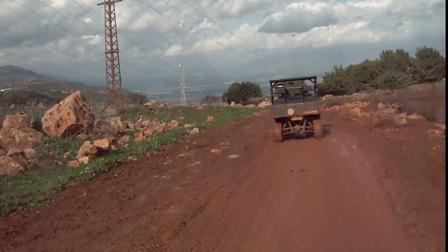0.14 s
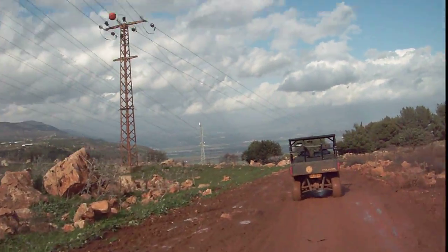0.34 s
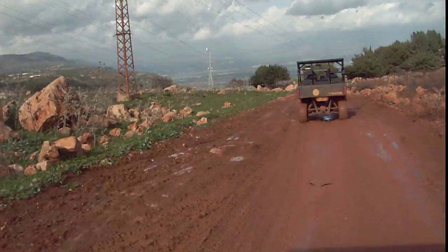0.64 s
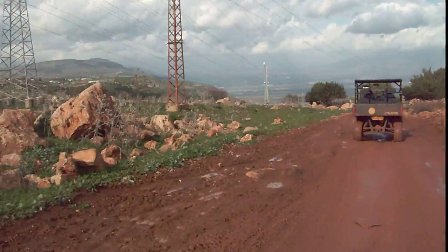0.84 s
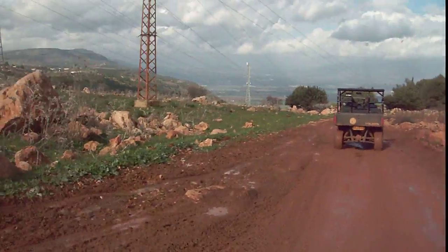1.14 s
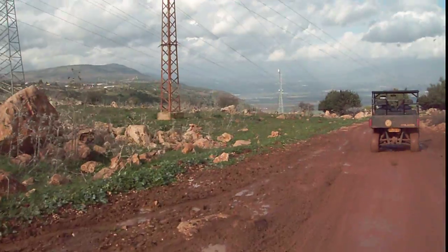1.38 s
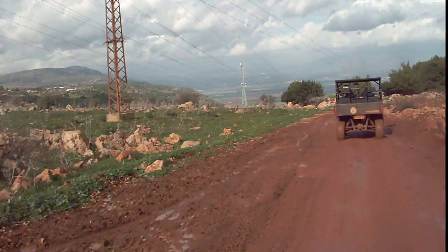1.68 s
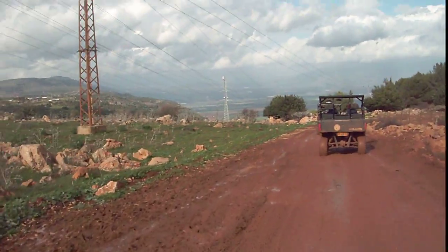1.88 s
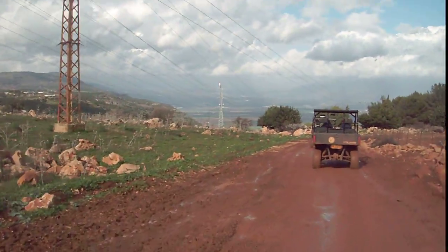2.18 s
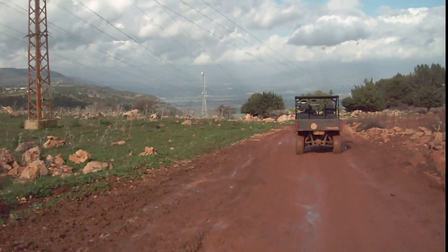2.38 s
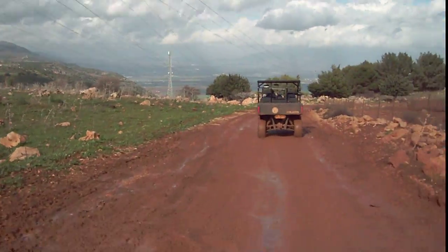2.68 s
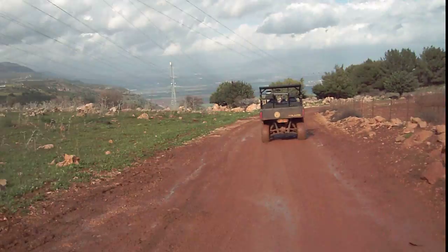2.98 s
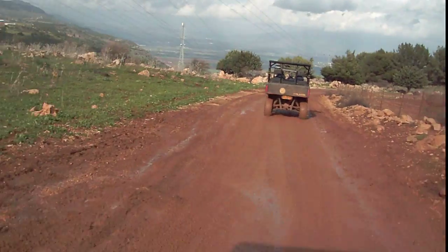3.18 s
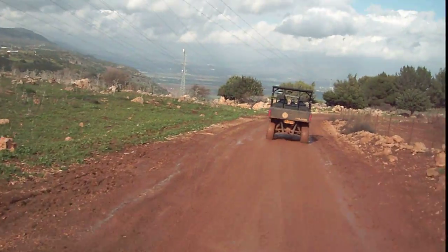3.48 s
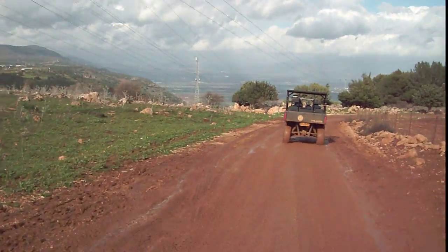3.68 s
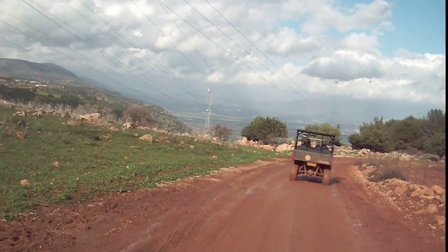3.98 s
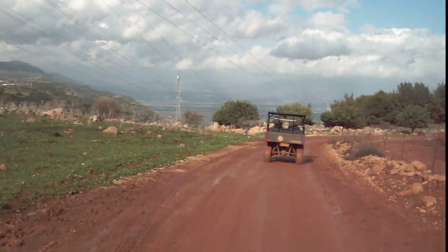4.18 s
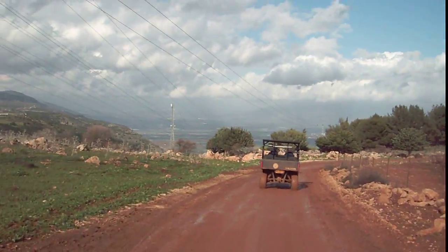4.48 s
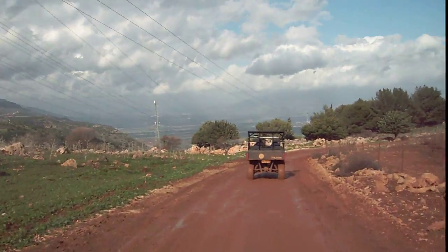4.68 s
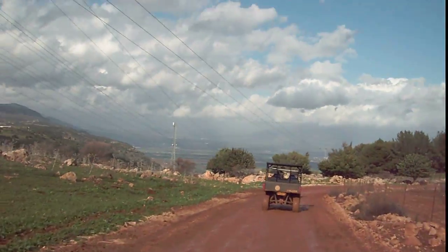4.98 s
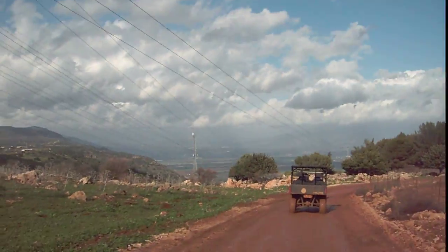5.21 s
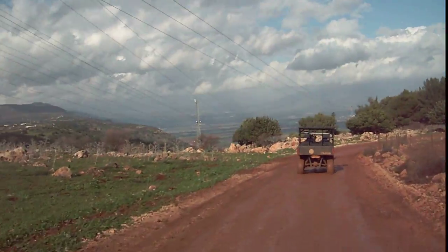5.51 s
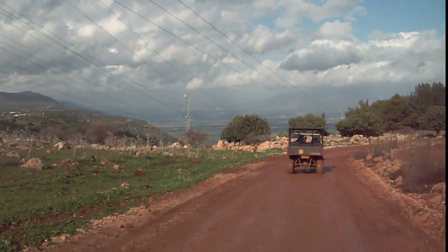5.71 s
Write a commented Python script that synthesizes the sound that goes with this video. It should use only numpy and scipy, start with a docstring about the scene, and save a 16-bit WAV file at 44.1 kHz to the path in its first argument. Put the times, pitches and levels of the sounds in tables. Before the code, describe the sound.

A side-by-side utility vehicle is heard on board as it drives along a dirt road in open country. Its low engine drone runs throughout, with valve and gear clatter, a faint belt whine, a thin high hiss and grit crunching lightly under the tyres. In the first second the engine pulls steadily while the body gives a few sharp rattles and a soft thud, and a couple of stones ping faintly. From about 1.3 seconds the engine eases off, dropping in pitch and level, and stays low until 3.7. Between 3 and 3.8 seconds, bumps bring a cluster of rattles and low thuds. Around 4 seconds the engine picks up with a brief belt squeal, followed by a longer boom from a rut at 4.4. It pulls on, easing slightly near 5.8 seconds. Low wind gusts buffet the microphone, most strongly in the first second or so.

```python
"""Engine of a side-by-side utility vehicle, heard on board on a dirt road, a second one ahead.
It pulls, eases off for two seconds and pulls again: a low exhaust drone of crank orders and gas puffs.
Valves and gears ring the casing; the drive belt sings, and squeals briefly as it takes up load.
Tyres crunch grit and fling stones, the body rattles on bumps and booms in ruts.
Slow gusts buffet the microphone."""
import sys
import numpy as np
from scipy import signal
from scipy.fft import rfft, irfft
from scipy.io import wavfile
from scipy.ndimage import uniform_filter1d

SR = 44100
rng = np.random.default_rng(int(sys.argv[2]) if len(sys.argv) > 2 else 0)


def log_audio(samples):
    """Write samples as a 16-bit WAV file to the path given in sys.argv[1]."""
    # one column per channel
    frames = np.atleast_2d(samples).T
    # limit to full scale, then quantise
    limited = np.clip(frames, -1, 1)
    pcm = np.round(limited * 32767).astype(np.int16)
    wavfile.write(sys.argv[1], SR, pcm)


N = 257984
TIME = np.arange(N) / SR

# engine casing modes: f/Hz, width/Hz, level/dB
CASING_MODES = [(1797, 103, -10.5), (1960, 140, -14), (2105, 15, -18), (2226, 78, -7), (2478, 140, -3.5),
                (2537, 74, 0.5), (2715, 112, -2), (2850, 380, -9.5), (3190, 430, -11), (4080, 2200, -27.5)]
# body panel modes: f/Hz, width/Hz, level/dB
PANEL_MODES = [(722, 55, -7), (834, 23, -1.5), (936.5, 65, 0.5), (1002, 37, -4.5), (1075, 87, -3.5),
               (1286, 75, 0.5), (1396, 92, -1)]
# noise spectrum of belt and tyres: f/Hz, level/dB
WASH_SPECTRUM = [(250, -1), (600, -5.5), (1000, -4.5), (1400, -3), (1600, -14), (2000, 1.5), (2600, 2),
                 (3300, -2.5), (4200, -9), (5200, -17.5), (6500, -19), (7800, -23), (10000, -16),
                 (15000, -51)]


def from_db(db):
    """Decibels to gain."""
    return 10 ** (np.asarray(db) / 20)


def unit_rms(x):
    """Scale to rms 1."""
    return x / np.sqrt(np.mean(x ** 2) + 1e-20)


def curve(rows):
    """Straight lines through (t/s, value) points."""
    return np.interp(TIME, *np.transpose(rows))


def swells(rows):
    """Sum of Gaussian bumps from (peak t/s, length/s, height) rows."""
    return sum(height * np.exp(-(2 * (TIME - t_s) / length_s) ** 2) for t_s, length_s, height in rows)


def drift(rate_hz):
    """Random wander below about rate_hz; rms 1."""
    f_hz = np.arange(N // 2 + 1) * SR / N
    return unit_rms(irfft(rfft(rng.standard_normal(N)) / (1 + (f_hz / rate_hz) ** 2) ** 2, N))


def coloured(x, spectrum):
    """Filter by (f/Hz, level/dB) points, falling 24 dB/octave outside them; rms 1."""
    f_hz = np.arange(N // 2 + 1) * SR / N + 1e-6
    hz, db = np.transpose(spectrum)
    outside_oct = np.maximum(np.log2(hz[0] / f_hz), 0) + np.maximum(np.log2(f_hz / hz[-1]), 0)
    gain = from_db(np.interp(np.log(f_hz), np.log(hz), db) - 24 * outside_oct)
    return unit_rms(irfft(rfft(x) * gain, N))


def bandpass(x, edges_hz, order):
    """Butterworth band-pass."""
    return signal.sosfilt(signal.butter(order, edges_hz, "band", fs=SR, output="sos"), x)


def resonance(x, hz, width_hz):
    """Two-pole resonator, peak gain 1."""
    r = np.exp(-np.pi * width_hz / SR)
    feedback = [1, -2 * r * np.cos(2 * np.pi * hz / SR), r * r]
    return signal.lfilter(np.array([1, 0, -1]) * (1 - r * r) / 2, feedback, x + 1e-18)


def ring(force, modes):
    """A rough contact force rings each mode separately; rms about that of the force."""
    ringing = sum(from_db(db) * resonance(force * rng.standard_normal(N), hz, width_hz)
                  for hz, width_hz, db in modes)
    power = sum(from_db(db) ** 2 * np.pi * width_hz / SR for _, width_hz, db in modes)
    return bandpass(ringing, [0.75 * modes[0][0], 1.12 * modes[-1][0]], order=4) / np.sqrt(power)


def knocks(rows, decay_s):
    """Contact force that jumps at each (t/s, level/dB) and decays."""
    impulses = np.zeros(N)
    for t_s, db in rows:
        impulses[round(t_s * SR)] = from_db(db)
    return signal.lfilter([1], [1, -np.exp(-1 / (decay_s * SR))], impulses + 1e-18)


def strokes(cycles, sharpness, uneven_db):
    """One decaying pulse of random strength per cycle; rms 1."""
    index = cycles.astype(int)
    strength = from_db(uneven_db * rng.standard_normal(index[-1] + 1))
    return unit_rms(strength[index] * np.exp(-sharpness * (cycles % 1)))


def engine_gain(law, speed_oct):
    """Gain that grows with engine speed and fades as the vehicle ahead draws away."""
    cruise_db, db_per_oct, loss_db_per_s = law
    return from_db(cruise_db + db_per_oct * speed_oct - loss_db_per_s * TIME)


def wind(speed_oct, cruise_db=-29, db_per_oct=6, restless_db=3.0, gain_db=-2.0):
    """Mostly infrasonic air pressure on the microphone: a stream plus single gusts."""
    # peak t/s, length/s, level/dB
    gust_hits = [(0.134, 0.14, -19), (0.486, 0.22, -21), (.78, .11, -15.5), (1.098, .26, -20),
                 (2.559, 0.065, -17.5), (3.45, 0.21, -22), (4.5, 0.092, -22.5), (4.956, 0.25, -23)]
    # f/Hz, level/dB
    spectrum = [(5, 0), (10, 0), (17, -4.5), (27, -13.0), (48, -19.0), (90, -28), (200, -29)]
    stream = from_db(cruise_db + db_per_oct * speed_oct + restless_db * drift(4.6))
    gusts = swells((t_s, length_s, from_db(db)) for t_s, length_s, db in gust_hits)
    pressure = coloured(rng.standard_normal(N), spectrum)
    levelled = pressure / np.sqrt(uniform_filter1d(pressure ** 2, size=SR // 5))
    return from_db(gain_db) * np.hypot(stream, gusts) * levelled


def tyre_roar(gain_db=-0.64, bumpy_db=0.8):
    """The uneven track shakes the panels through the tyres."""
    # track roughness: t/s, level/dB
    roughness = [(0, -43), (.8, -43), (1.6, -45), (2.85, -46.3), (3.4, -44), (4.6, -44.5), (5.0, -42),
                 (5.3, -45), (5.85, -44)]
    force = from_db(bumpy_db * drift(9.8))
    return from_db(gain_db + curve(roughness)) * ring(force, PANEL_MODES)


def thuds(gain_db=-3.5):
    """Wheels drop into ruts and the chassis booms."""
    # peak t/s, length/s, level/dB
    ruts = [(0.445, .09, -30), (3.266, 0.086, -25.5), (3.534, 0.13, -25.5), (3.772, 0.071, -25.5),
            (4.372, 0.32, -25.5)]
    # chassis boom: f/Hz, level/dB
    boom_spectrum = [(60, 3), (110, 8.5), (170, 2), (260, -10), (400, -19.5)]
    force = swells((t_s, length_s, from_db(db)) for t_s, length_s, db in ruts)
    return from_db(gain_db) * force * coloured(rng.standard_normal(N), boom_spectrum)


def stones(width_hz=400, gain_db=-17.0):
    """Stones flung by the tyres give short bright pings."""
    # t/s, level/dB, f/Hz
    hits = [(.54, -29, 6100), (0.641, -25, 4580), (2.74, -30, 5240), (3.46, -30, 5870)]
    pings = sum(ring(knocks([(t_s, db)], decay_s=0.0096), [(hz, width_hz, 0)]) for t_s, db, hz in hits)
    return from_db(gain_db) * pings


def rattles(casing_db=-2.5, panel_db=-12.5, scrape_db=-6.0):
    """Each bump makes loose parts chatter for a few milliseconds."""
    # t/s, level/dB
    bumps = [(.1042, -22.5), (.6394, -29), (.8206, -26.5), (1.7384, -31), (3.0132, -29), (3.2711, -26.5),
             (3.4464, -28), (3.5114, -31), (3.5843, -28), (3.8343, -28), (4.617, -35)]
    force = knocks(bumps, decay_s=0.004)
    scrape = np.sqrt(np.mean(force ** 2)) * coloured(force * rng.standard_normal(N), WASH_SPECTRUM)
    casing = from_db(casing_db) * ring(force, CASING_MODES)
    panels = from_db(panel_db) * ring(force, PANEL_MODES)
    return casing + panels + from_db(scrape_db) * scrape


def grit(cracks_per_s=1100, spread_db=0.5, gain_db=-18.5):
    """Small stones crack under the tyres in clumps."""
    cracks = rng.random(N) < cracks_per_s * from_db(4 * drift(10)) / SR
    sizes = from_db(spread_db * np.minimum(rng.exponential(1, N), 4))
    signs = rng.choice([-1, 1], N)
    return from_db(gain_db) * unit_rms(bandpass(cracks * sizes * signs, [1800, 6500], order=2))


def gear_hiss(turns, gain_db=-0.1, flutter_db=0.7):
    """Fine hiss of the running gear, pulsing lightly twice a turn."""
    # f/Hz, level/dB
    spectrum = [(4000, -16), (6000, -8.5), (7700, -9), (8300, -3), (8900, 3), (9400, 4.5), (9900, 1),
                (10600, -6.5), (11300, -14), (12200, -22), (13500, -25), (16000, -27)]
    # t/s, level/dB
    levels = [(0, -50.5), (.7, -49), (0.99, -47), (1.4, -50.8), (2.15, -50.5), (3.05, -53.2), (3.85, -53),
              (4.4, -51), (5.15, -49), (5.85, -50.5)]
    pulsing = strokes(2 * turns, sharpness=0.36, uneven_db=1.0) * from_db(flutter_db * drift(23))
    return from_db(gain_db + curve(levels)) * coloured(rng.standard_normal(N) * pulsing, spectrum)


def belt_squeals(wobble_hz=5.0):
    """The belt slips briefly as the drive takes up load."""
    # centre t/s, length/s, f/Hz, level/dB
    slips = [(4.0, 0.13, 1395, -44), (4.117, 0.061, 1260, -47)]
    squeals = np.zeros(N)
    for t_s, length_s, hz, db in slips:
        envelope = np.exp(-(2 * (TIME - t_s) / length_s) ** 4)
        phase = 2 * np.pi * np.cumsum(hz + wobble_hz * drift(61)) / SR
        squeals += np.sqrt(2) * from_db(db) * envelope * np.sin(phase)
    return squeals


def belt(throttle, hz=1386.0, width_hz=160.0, gain_db=-11.0, slack_db=-7.0):
    """The drive belt sings against its pulleys, louder under load."""
    rubbing = resonance(resonance(rng.standard_normal(N), hz, width_hz), hz, width_hz)
    return from_db(gain_db + slack_db * (1.5 - throttle)) * unit_rms(rubbing)


def clatter(turns, throttle, valve_db=-9.5, mesh_db=-2.0, wash_db=-4.5, slack_db=-2.0, flutter_db=0.77):
    """Valve taps and steady gear and belt rub ring the casing; a broad wash rises with load."""
    taps = from_db(valve_db) * strokes(2 * turns, sharpness=12.0, uneven_db=1.5)
    force = np.hypot(taps, from_db(mesh_db))
    casing = ring(force, CASING_MODES) * from_db(flutter_db * drift(23))
    wash = coloured(rng.standard_normal(N), WASH_SPECTRUM)
    return casing + from_db(wash_db + slack_db * (1 - throttle)) * wash


def exhaust(turns, throttle, waver_db=0.48, puff_db=-5.5, coast_boost_db=2.5, pipe_db=-26.0):
    """Crank orders, fuller under throttle; a gas puff on every turn also rings the tail pipe."""
    # multiple of crank speed, coasting level/dB, pulling level/dB
    orders = [(1, -9, -2.5), (2, -4.5, -5), (3, -6, -6), (3.5, -16.5, -9), (4, -20.5, -10.5),
              (5, -17, -14.5), (6, -15, -31), (8, -31, -28.5), (9, -60, -25), (10, -40.5, -17),
              (11, -31, -26), (12, -31, -23), (13, -31.5, -34)]
    # f/Hz, level/dB
    puff_spectrum = [(35, -4.5), (52, -2), (80, 2.5), (125, 3), (180, -0.65), (220, -9), (260, -11.5),
                     (300, -17), (345, -15), (440, -14), (520, -21), (640, -26), (1000, -27)]
    shaky_turns = turns + 0.003 * drift(12)
    note = np.zeros(N)
    for order, coast_db, pull_db in orders:
        level_db = coast_db + throttle * (pull_db - coast_db) + waver_db * drift(26)
        smear_cycles = 0.17 * rng.standard_normal()  # the muffler smears the firing pulse
        note -= np.sqrt(2) * from_db(level_db) * np.cos(2 * np.pi * (order * shaky_turns + smear_cycles))
    gas = rng.standard_normal(N) * strokes(turns, sharpness=0.55, uneven_db=1.5)
    puffs = from_db(puff_db + coast_boost_db * (1 - throttle)) * coloured(gas, puff_spectrum)
    pipe = resonance(resonance(gas, hz=348, width_hz=61), hz=348, width_hz=61)
    return note + puffs + from_db(pipe_db) * unit_rms(pipe)


def scene(cruise_hz=36):
    """Mono mix: crank angle times the engine's pulses, crank speed sets their level."""
    # crank speed: t/s, f/Hz
    crank_speed = [(0.0, 35.3), (0.3, 36.0), (0.72, 36.6), (0.95, 36.3), (1.24, 36.1), (1.42, 33.2),
                   (1.81, 31.2), (2.3, 29.2), (2.74, 30.3), (3.39, 30.4), (3.7, 29.3), (4.0, 33.7),
                   (4.4, 35.1), (4.9, 36.9), (5.3, 36.5), (5.55, 36.1), (5.85, 33.2)]
    # t/s, throttle/0-1
    pedal = [(0, 1), (1.25, 0.89), (1.7, 0.53), (2.4, 0), (3.65, 0), (4.05, 0.82), (5.1, 0.9), (5.85, 0.62)]
    # brief rises of the running gear: peak t/s, length/s, boost/dB
    surges = [(.18, .16, 0.5), (0.616, 0.13, 0.5), (.85, 0.072, 1.0), (2.11, .12, 2.0), (2.308, 0.045, 3.5),
              (4.07, 0.22, 1.0)]
    # both: cruise level/dB, rise/(dB per octave of speed), loss/(dB per s)
    exhaust_law = (-28.5, 9.2, 0.026)
    gear_law = (-35, 10.1, 0.36)
    crank_hz = curve(crank_speed)
    throttle = curve(pedal)
    turns = np.cumsum(crank_hz) / SR
    speed_oct = np.log2(crank_hz / cruise_hz)
    drone = engine_gain(exhaust_law, speed_oct) * exhaust(turns, throttle)
    gear_gain = engine_gain(gear_law, speed_oct) * from_db(swells(surges))
    running_gear = gear_gain * (clatter(turns, throttle) + belt(throttle) + grit())
    track = tyre_roar() + rattles() + stones() + thuds()
    return (drone + running_gear + gear_hiss(turns) + track + belt_squeals() + wind(speed_oct))[None]


def record(dry, noise_db=-63.0, cutoff_hz=15750):
    """The camera adds a faint whine and hiss and cuts the top."""
    # electronic whine: f/Hz, level/dB
    whine_tones = [(5900, -79), (7867, -71.5), (15734, -89)]
    whine = sum(np.sqrt(2) * from_db(db) * np.sin(2 * np.pi * hz * TIME) for hz, db in whine_tones)
    noise = from_db(noise_db) * rng.standard_normal(N)
    lowpass = signal.ellip(12, 0.1, 90, cutoff_hz, fs=SR, output="sos")
    return signal.sosfilt(lowpass, dry + whine + noise)


dry = scene()
out = record(dry)
log_audio(out)
```